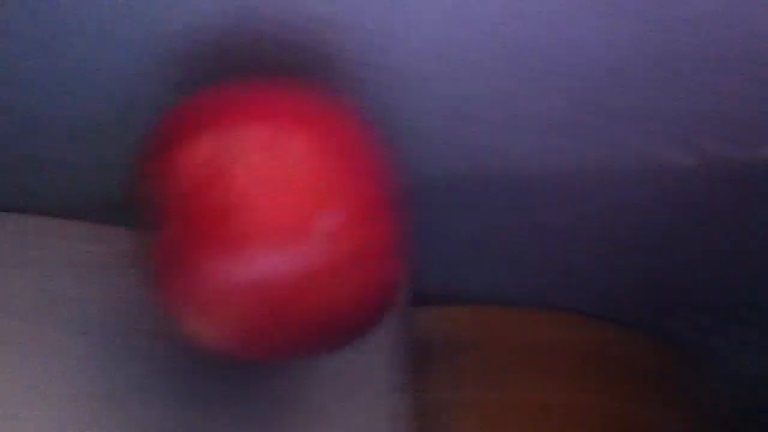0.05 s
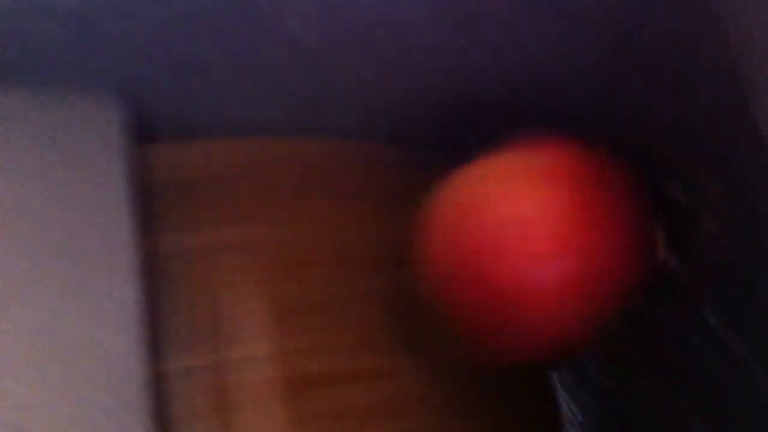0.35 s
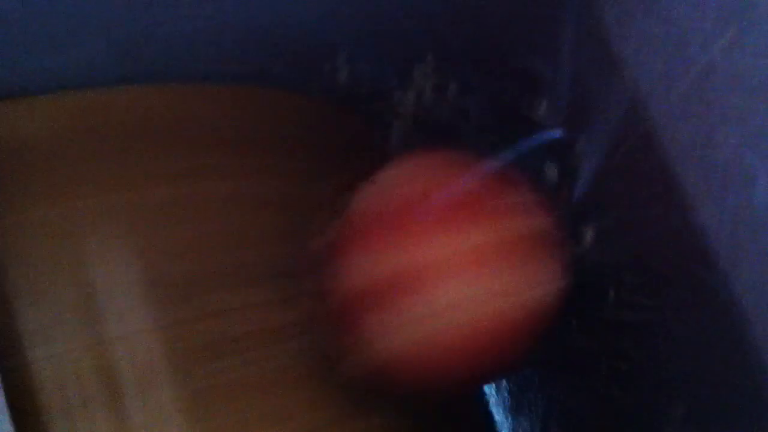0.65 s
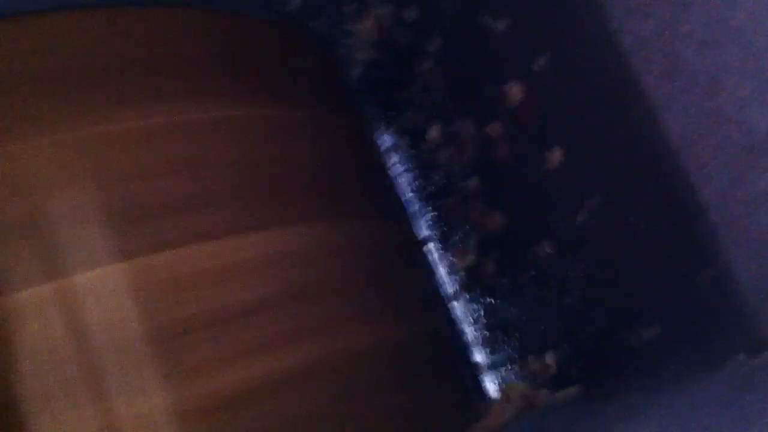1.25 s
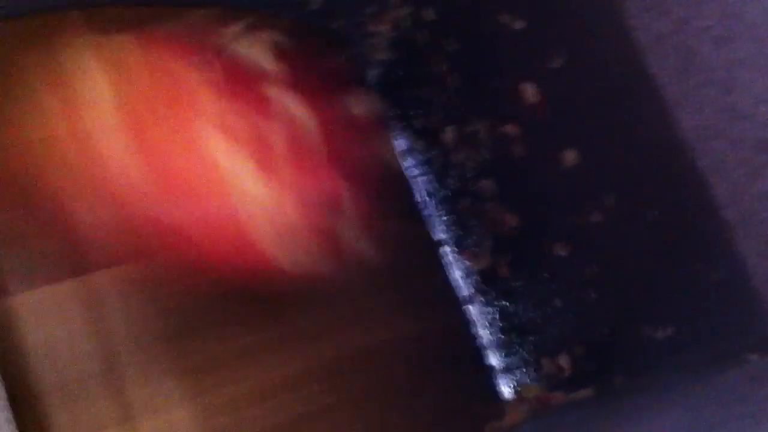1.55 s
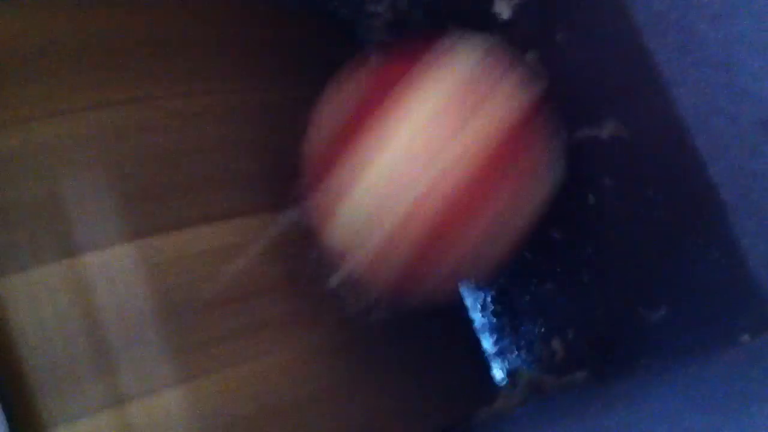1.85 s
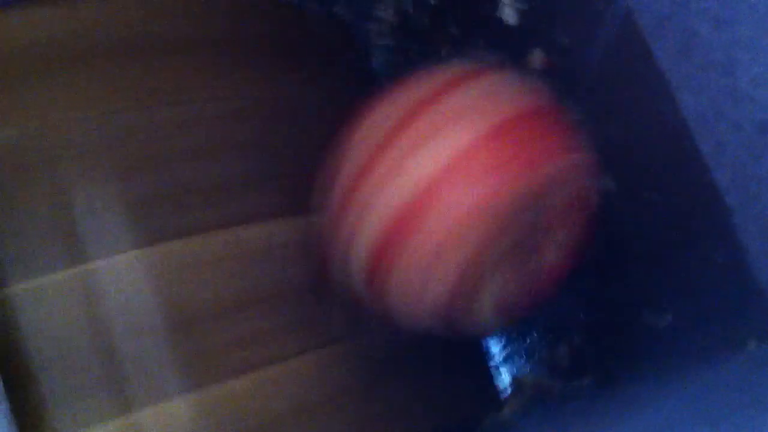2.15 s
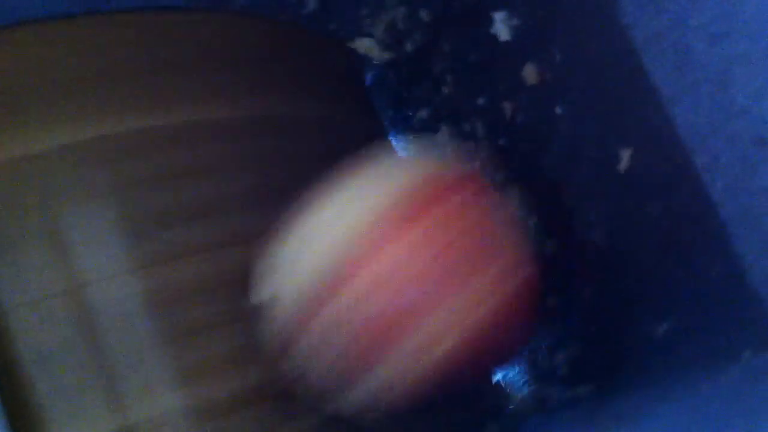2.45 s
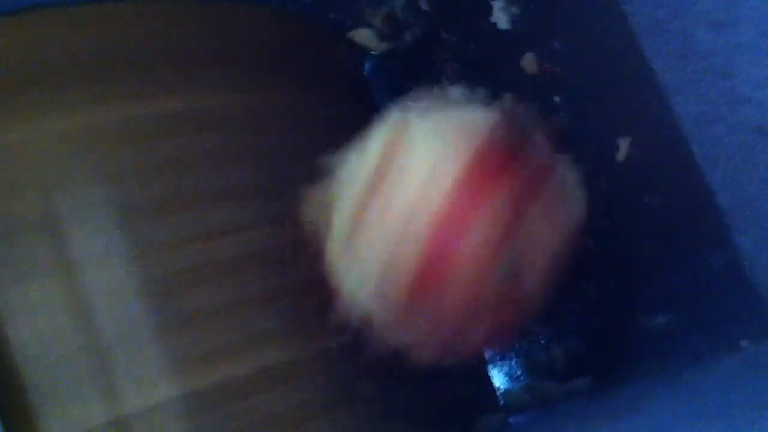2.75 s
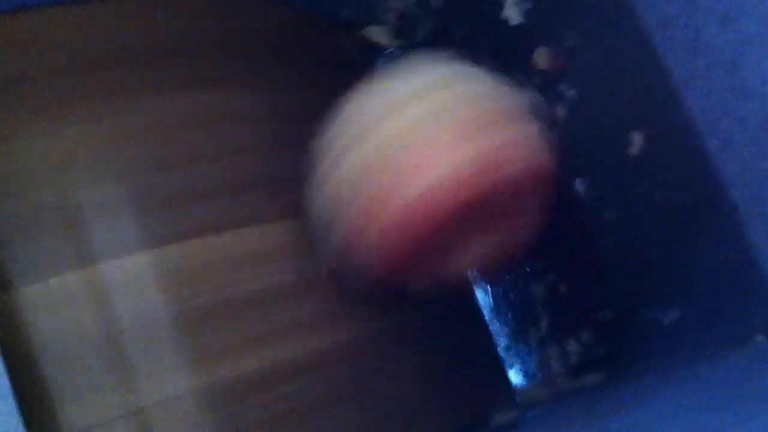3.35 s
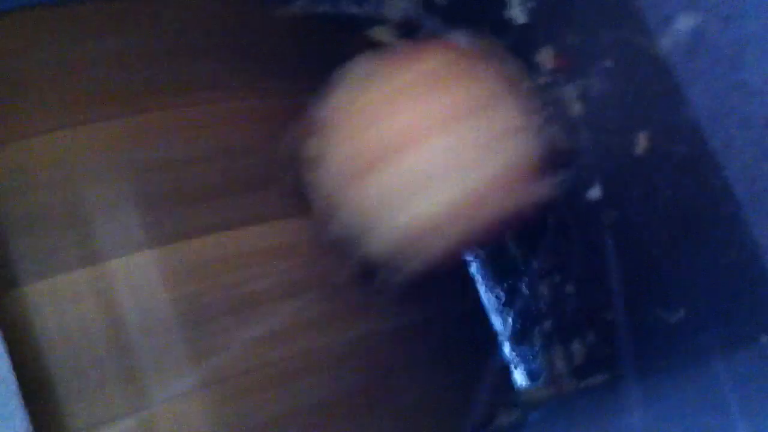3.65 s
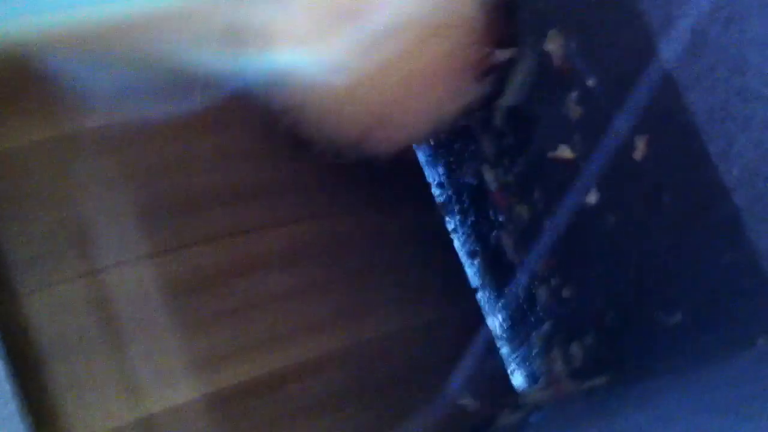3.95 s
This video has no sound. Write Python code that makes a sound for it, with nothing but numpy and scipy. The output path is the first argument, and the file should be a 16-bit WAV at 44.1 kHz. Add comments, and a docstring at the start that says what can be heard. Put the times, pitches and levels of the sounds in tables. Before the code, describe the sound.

Apples are shredded in an electric grinder, heard close above the hopper. Quick wet crunches and hollow thumps ride over a pulsing motor drone. The crunching pauses briefly while apples bounce, then returns in rapid bursts.

```python
"""Apples in an electric grinder

The housing drones with the motor; the spinning drum scuffs once a turn and hisses as it gets wet.
Apples bounce in the hopper, and hard landings thump the housing. At each touch of the drum the knives
tear off a fast train of wet crunches; at times the skin cracks. Shreds tick on the wall."""
import sys
import numpy as np
from scipy import signal
from scipy.io import wavfile
from scipy.ndimage import uniform_filter1d

SR = 44100
rng = np.random.default_rng(int(sys.argv[2]) if len(sys.argv) > 2 else 0)


def int16_out(signal):
    """Quantize to a 16-bit WAV file."""
    q = np.round(np.clip(np.atleast_2d(signal).T, -1, 1) * 32767)
    wavfile.write(sys.argv[1], SR, q.astype(np.int16))


N = 176400

# apple against the knives (start [s], length [s], crunch level [dB], pulp level [dB])
BITES = [(0.311, 0.0076, -13.5, -19), (0.4195, 0.01, -14, -21.5), (0.5238, 0.032, -16, -21),
         (0.585, 0.061, -21, -30), (0.646, 0.044, -33, -33.5), (0.6798, 0.011, -16, -29.5),
         (0.715, 0.0036, -38, -29), (0.734, 0.028, -18, -21), (0.801, 0.018, -19.5, -28),
         (0.9448, 0.012, -16, -25.5), (1.646, 0.012, -13.5, -21), (1.755, 0.0094, -17.5, -25),
         (1.792, 0.033, -17, -27.5), (1.85, 0.011, -17, -18.5), (1.876, 0.024, -18, -25.5),
         (1.9976, 0.007, -13.5, -22), (2.033, 0.012, -14.5, -29), (2.129, 0.01, -19.5, -23.5),
         (2.195, 0.012, -18, -23), (2.3225, 0.0091, -16.5, -20), (2.3564, 0.0045, -23.5, -29),
         (2.407, 0.05, -19.5, -25.5), (2.491, 0.026, -19.5, -26), (2.614, 0.026, -18, -25.5),
         (2.644, 0.023, -31, -37), (2.7287, 0.018, -18.5, -25.5), (2.8, 0.005, -28.5, -35),
         (2.843, 0.016, -15, -23), (2.939, 0.0166, -15, -23), (2.993, 0.011, -17.5, -23),
         (3.1218, 0.057, -19, -22), (3.1885, 0.014, -20, -24), (3.213, 0.018, -23.5, -27.5),
         (3.2727, 0.04, -22, -27.5), (3.348, 0.0039, -16.5, -33), (3.386, 0.061, -17, -30),
         (3.4885, 0.057, -22, -32.5), (3.567, 0.04, -17, -29), (3.609, 0.044, -19.5, -30.5),
         (3.707, 0.025, -17, -29.5), (3.743, 0.053, -20, -27.5), (3.8086, 0.019, -18.5, -27),
         (3.871, 0.0017, -12.5, -22.5), (3.881, 0.023, -25, -31), (3.9548, 0.02, -22, -23.5)]

TURN_HZ, KNIVES, SCUFF_AT_S = 10.54, 15, 0.058
GRAIN_DB, SIZE_SPREAD_DB = 3.2, 4
OVERTONE_RATIO = 1.702
BAND_EDGE_HZ = 16000


def amp(db):
    return 10 ** (np.asarray(db) / 20)


def unit(x):
    return x / np.sqrt(np.mean(x ** 2) + 1e-20)


def add(mix, start_s, sound):
    part = mix[max(round(start_s * SR), 0):][:len(sound)]
    part += sound[:len(part)]


def resonate(x, hz, q):
    """One resonance of gain 1."""
    return signal.lfilter(*signal.iirpeak(min(hz, SR / 3), q, fs=SR), x)


def colour(x, spectrum, hopper=True):
    """Minimum-phase filter of unit power, with or without the hopper's resonances."""
    # hopper resonances and one hollow (frequency [Hz], gain [dB])
    hopper_modes = [(585, -7), (940, 4), (1430, 5), (1760, 1), (2300, 5), (4000, 3.5), (5200, 6),
                    (6450, 3.5), (7800, 2.5)]
    log_hz = np.log(abs(np.fft.fftfreq(2 ** 12, 1 / SR)) + 1)
    points_hz, points_db = np.transpose(spectrum)
    db = np.interp(log_hz, np.log(points_hz), points_db)
    if hopper:
        db += sum(gain * np.exp(-((log_hz - np.log(hz)) / 0.071) ** 2) for hz, gain in hopper_modes)
    log_response = np.conj(signal.hilbert(np.log(unit(amp(db)))))
    taps = np.fft.ifft(np.exp(log_response)).real
    return signal.oaconvolve(x, taps)[:N]


def drift(samples):
    """Smooth random curve of unit RMS."""
    return unit(uniform_filter1d(uniform_filter1d(rng.standard_normal(N), samples), samples))


def grains():
    """Noise clumped into tiny snaps of bursting cells."""
    return unit(rng.standard_normal(N) * amp(GRAIN_DB * drift(samples=11)))


def motor_drone():
    """The housing drones unevenly with the motor, swelling once a turn."""
    # drone spectrum (frequency [Hz], relative density [dB])
    spectrum = [(25, -69.5), (120, -28), (195, -8), (222, 3), (270, -7.5), (315, -4), (370, -12),
                (470, -13.5), (610, -26.5), (700, -16), (900, -22.5), (2300, -34.5), (3200, -43),
                (16000, -68)]
    # drone envelope (time [s], level [dB])
    levels = [(0, -26.5), (1.55, -26.5), (1.95, -28.5), (3.1, -26)]
    swing_db, lead_s, lump_db, body_hz = 2.8, 0.016, 1.7, 545
    t = np.arange(N) / SR
    swing = np.cos(2 * np.pi * TURN_HZ * (t - SCUFF_AT_S + lead_s))
    level_db = np.interp(t, *np.transpose(levels)) + swing_db * swing
    drone = colour(rng.standard_normal(N), spectrum, hopper=False) * amp(level_db)
    body = signal.sosfiltfilt(signal.butter(2, body_hz, fs=SR, output="sos"), drone)
    lumps = unit(amp(lump_db * drift(samples=1400)))
    return drone + body * (lumps - 1)


def drum_scuff():
    """The drum scuffs once a turn, with a faint ring."""
    # scuff spectrum (frequency [Hz], relative density [dB])
    spectrum = [(100, -55), (230, 6), (2300, 9), (16000, -25.5)]
    half_width_s = 0.0097
    turns = (np.arange(N) / SR - SCUFF_AT_S) * TURN_HZ
    offset_s = ((turns + .5) % 1 - .5) / TURN_HZ
    contact = np.exp(-(offset_s / half_width_s) ** 2)
    scuff = unit(colour(contact * rng.standard_normal(N), spectrum))
    return amp(-44) * unit(scuff + 2 * resonate(scuff, hz=2294, q=11))


def wet_hiss():
    """Hiss fades in as the drum gets wet."""
    hz, q, wetting_s = 7500, 2, 0.8
    hiss = unit(resonate(resonate(rng.standard_normal(N), hz, q), hz, q))
    return amp(-59) * hiss * np.minimum(np.arange(N) / SR / wetting_s, 1)


def knocks():
    """A landing apple ticks, clacks and sets the housing ringing."""
    # hard landings (time [s], thump level [dB], clack pitch [Hz], clack level [dB])
    landings = [(0.1047, -8.5, 1544, -13), (0.377, -13, 824, -11.5), (.765, -17.5, 740, -16.5),
                (0.996, -8, 940, -11), (1.103, -16, 730, -10), (1.374, -13, 2120, -17.5),
                (1.650, -22.5, 930, -18), (1.726, -36, 810, -22.5), (2.497, -19, 920, -16.5),
                (2.677, -15.5, 765, -20), (2.968, -9.5, 1040, -18.5), (3.642, -39, 924, -14)]
    # housing modes (frequency [Hz], relative level [dB], T60 [s])
    housing_modes = [(226.2, -3.5, .12), (305.5, 0, 0.059), (717, -13.5, 0.065), (954, -21.5, 0.097)]
    thump_rise_s, clack_t60_s, tick_decay_s, low_cut_hz = 0.0057, 0.04, 0.005, 134
    rings, ticks = np.zeros((2, N))
    t = np.arange(SR // 4) / SR
    thump = sum((-1) ** k * amp(db - 60 * t / t60_s) * np.sin(2 * np.pi * hz * t)
                for k, (hz, db, t60_s) in enumerate(housing_modes))
    thump *= 1 - np.exp(-t / thump_rise_s)
    for start_s, thump_db, clack_hz, clack_db in landings:
        add(rings, start_s, amp(thump_db + 5) * thump)
        phase = 2 * np.pi * clack_hz * t
        clack = np.sin(phase) + amp(-10.5) * np.sin(OVERTONE_RATIO * phase)
        add(rings, start_s, amp(clack_db - 60 * t / clack_t60_s) * clack)
        add(ticks, start_s, amp(clack_db - 3.5) * np.exp(-t / tick_decay_s))
    ticks = colour(ticks * grains(), [(200, -2.5), (900, 3.5), (15000, -25)], hopper=False)
    return signal.sosfilt(signal.butter(2, low_cut_hz, "high", fs=SR, output="sos"), rings + ticks)


def juice_pops():
    """Juice pockets burst at random: tiny rings of varied pitch and size."""
    pops_per_s, width_hz, bands = 2000, 700, 20
    out = np.zeros(N)
    for hz in np.linspace(width_hz, BAND_EDGE_HZ, bands):
        sizes = amp(SIZE_SPREAD_DB * np.clip(rng.standard_normal(N), -2, 2)) * rng.choice([-1, 1], N)
        bursts = rng.random(N) < pops_per_s / bands / SR
        out += resonate(sizes * bursts, hz, hz / width_hz)
    return unit(out)


def knife_cuts():
    """Each passing knife tears the apple, which rings; returns crunch and pulp."""
    rise_s, fall_s, sag_db, pressure_db = 0.0031, 0.0048, -5, 2.7
    knife_s, between_knives = 0.0019, 0.52
    apple_hz, apple_q, log_spread = 1298, 14, 0.36
    crunch, pulp = np.zeros((2, N))
    t = np.arange(SR // 4) / SR
    knife, since_s = np.divmod(t, 1 / (TURN_HZ * KNIVES))
    stroke = np.exp(-(since_s / knife_s - .5) ** 2)
    snaps, pressure = unit(grains() + juice_pops()), drift(samples=350)
    for start_s, length_s, crunch_db, pulp_db in BITES:
        contact = np.minimum(t / rise_s, 1) * np.exp(-np.maximum(t - length_s, 0) / fall_s)
        contact *= amp(sag_db * np.minimum(t / length_s, 1))
        contact *= amp(pressure_db * np.roll(pressure, -round(start_s * SR))[:len(t)])
        depth = amp(SIZE_SPREAD_DB * rng.standard_normal(64))[knife.astype(int)]
        cut = contact * (between_knives + depth * stroke)
        ring_hz = apple_hz * np.exp(log_spread * rng.uniform(-0.95, 1))
        for mix, db, hz in (pulp, pulp_db, ring_hz), (crunch, crunch_db, 2 * ring_hz):
            tear = cut * np.roll(snaps, rng.integers(N))[:len(t)]
            ring = resonate(tear, hz, apple_q) + resonate(tear, hz * OVERTONE_RATIO, apple_q) / 2
            tear += amp(1) * ring
            add(mix, start_s, amp(db) * tear / np.sqrt(np.mean(tear[t < length_s] ** 2)))
    return crunch, pulp


def shred_spray():
    """Shreds tick on the wall, building during each bite and dying away after it."""
    decay_s, spread_db = 0.052, 5
    power = np.zeros(N)
    t = np.arange(SR // 4) / SR
    for start_s, length_s, crunch_db, _ in BITES:
        envelope = np.minimum(t / length_s, 1) * np.exp(-np.maximum(t - length_s, 0) / decay_s)
        add(power, start_s, (amp(crunch_db) * envelope) ** 2)
    return np.sqrt(power) * unit(grains() * amp(spread_db * drift(samples=130)))


def skin_cracks():
    """The skin splits at a knife's first touch."""
    # skin splits (time [s])
    splits_s = [0.422, 0.5249, 1.65, 1.7566, 2.130, 2.324, 2.7335, 3.122]
    decay_s = 0.0029
    out = np.zeros(N)
    t = np.arange(SR // 4) / SR
    for start_s in splits_s:
        add(out, start_s, np.exp(-t / decay_s) * rng.standard_normal(len(t)))
    return out


def shredding():
    """Bright cuts, cracks and spray over dull pulp, all coloured by the hopper."""
    # crunch and pulp spectra (frequency [Hz], relative density [dB])
    crunch_spectrum = [(30, -2), (900, -16.5), (2000, -3.5), (3000, 2.5), (5000, -2.5), (15500, -8.5)]
    pulp_spectrum = [(95, -21), (250, 4), (780, 0.5), (2100, -4.5), (3500, -17.5), (12000, -34)]
    crunch, pulp = knife_cuts()
    crunch += amp(-11.5) * skin_cracks()
    tearing = amp(-6) * crunch + amp(-27) * shred_spray()
    return colour(tearing, crunch_spectrum) + colour(pulp, pulp_spectrum)


def hopper_echo(x, t60_s=0.015):
    """Short, dense reflections between the hopper walls."""
    t = np.arange(SR // 5) / SR
    tail = rng.standard_normal(len(t)) * amp(-60 * t / t60_s) * (t > .002)
    return signal.oaconvolve(x, tail / np.linalg.norm(tail))[:N]


def scene():
    """Apples and machine, heard from just above the hopper."""
    apples = shredding() + knocks()
    return (apples + amp(-9.5) * hopper_echo(apples) + motor_drone() + drum_scuff() + wet_hiss())[None]


def record(dry):
    """Soft clip, then band limit."""
    ceiling = amp(-5.5)
    low_pass = signal.firwin(401, BAND_EDGE_HZ, window=("kaiser", 8), fs=SR)
    return signal.oaconvolve(ceiling * np.tanh(dry / ceiling), low_pass[None], "same")


dry = scene()
out = record(dry)
int16_out(out)
```